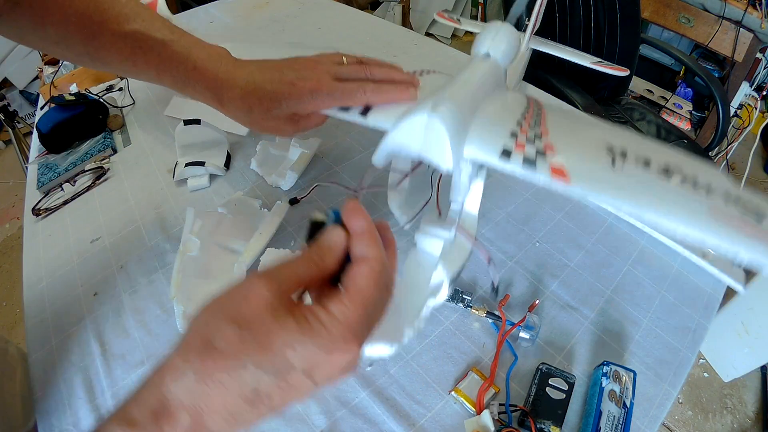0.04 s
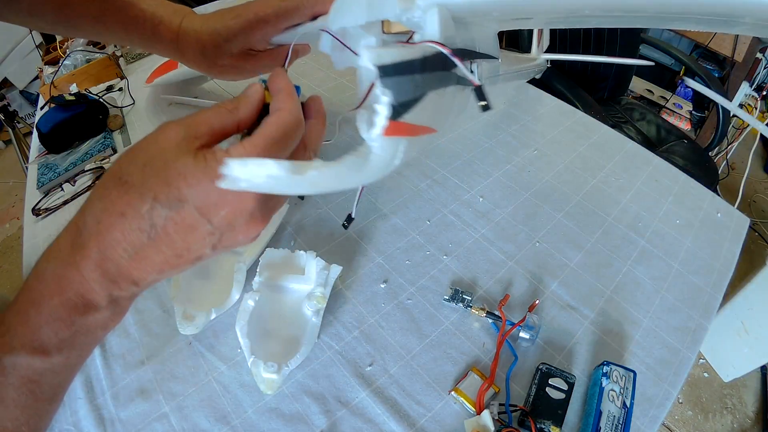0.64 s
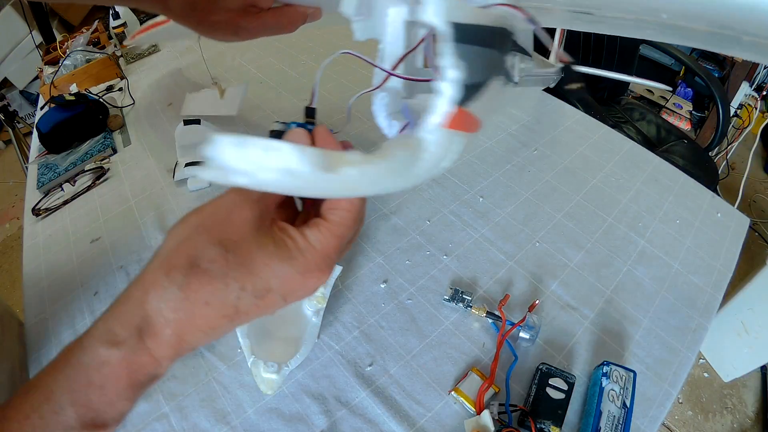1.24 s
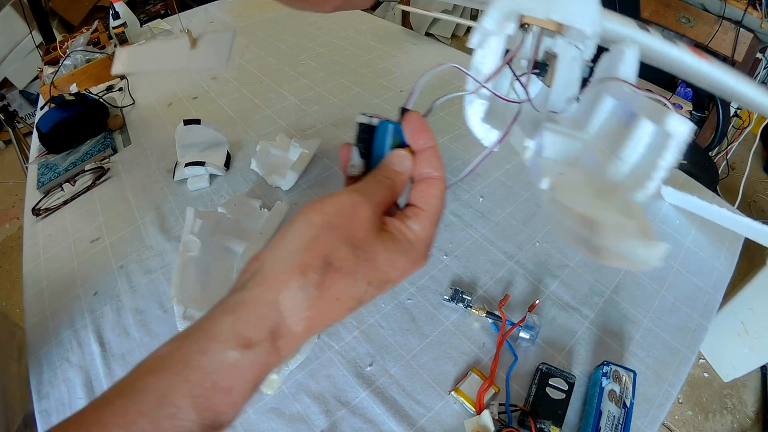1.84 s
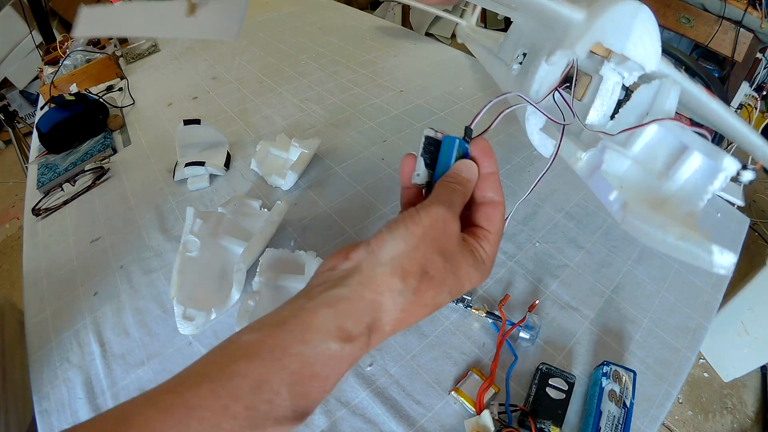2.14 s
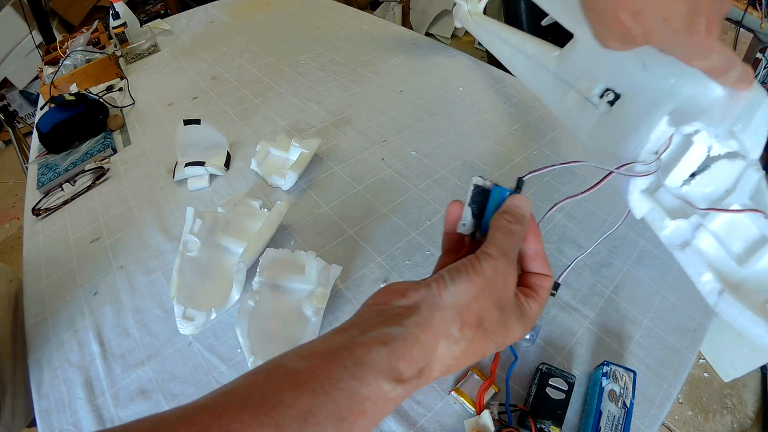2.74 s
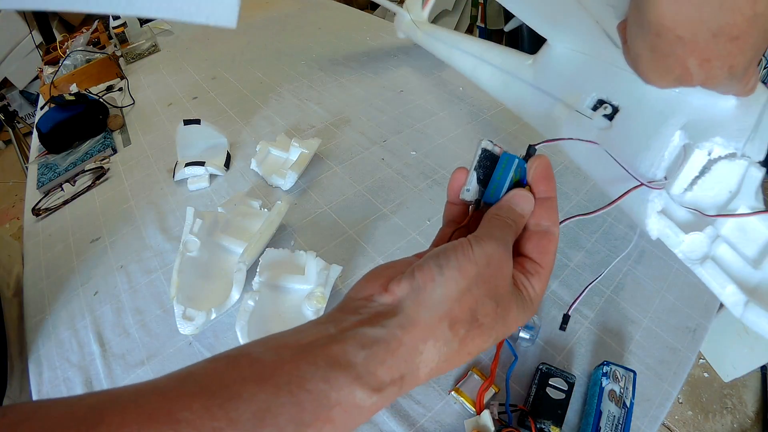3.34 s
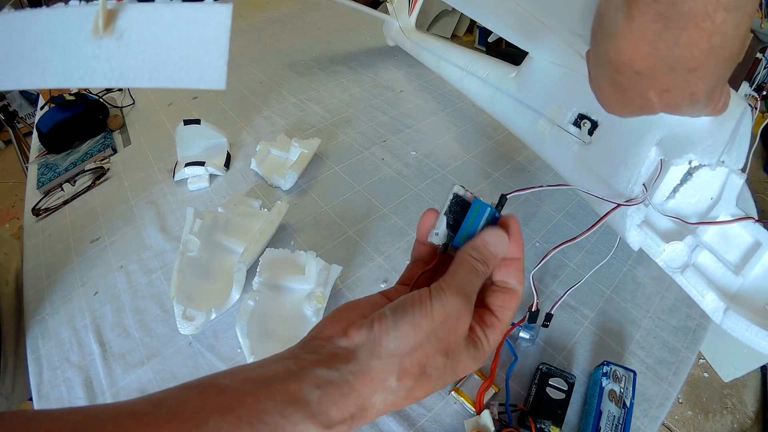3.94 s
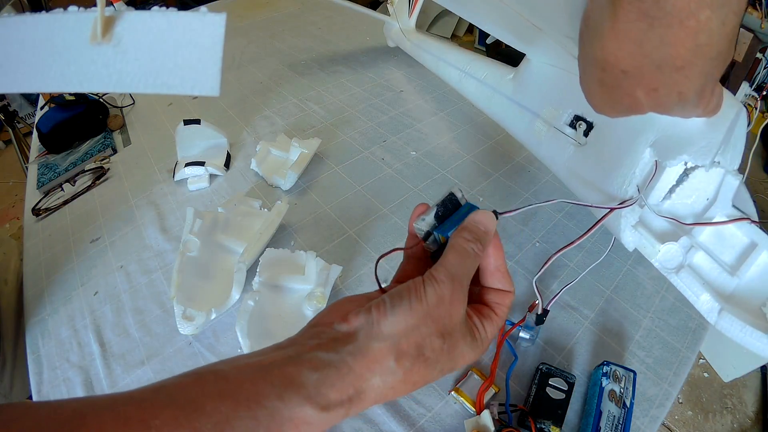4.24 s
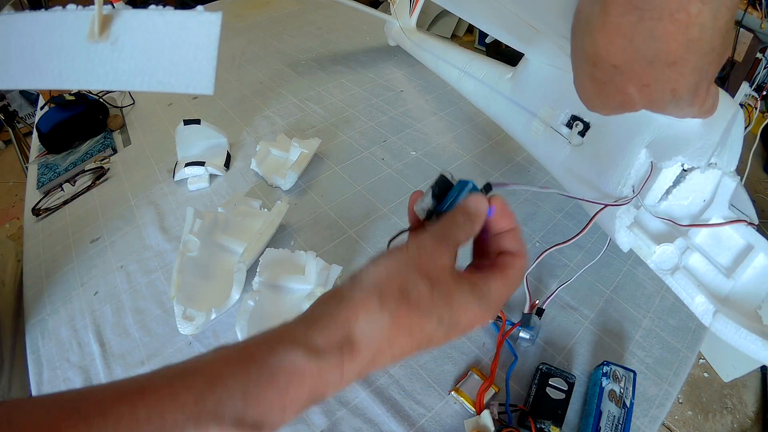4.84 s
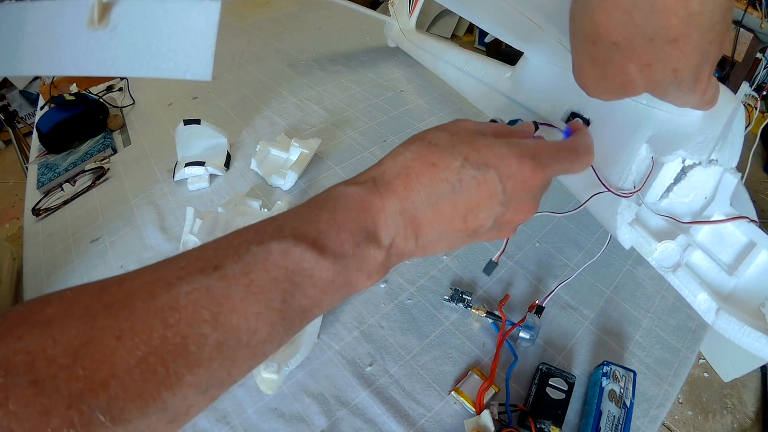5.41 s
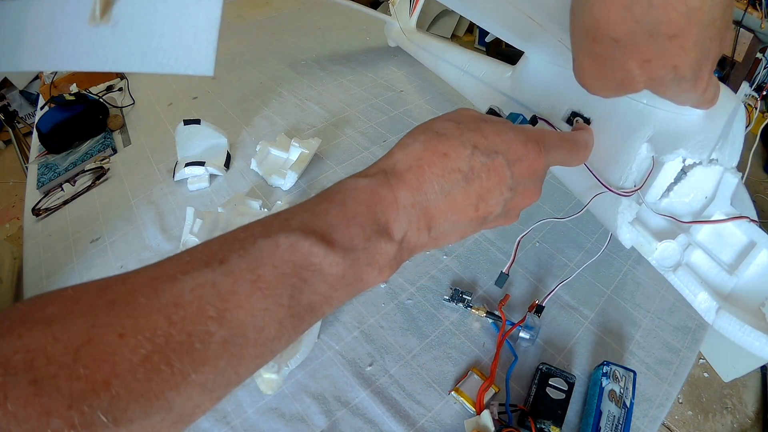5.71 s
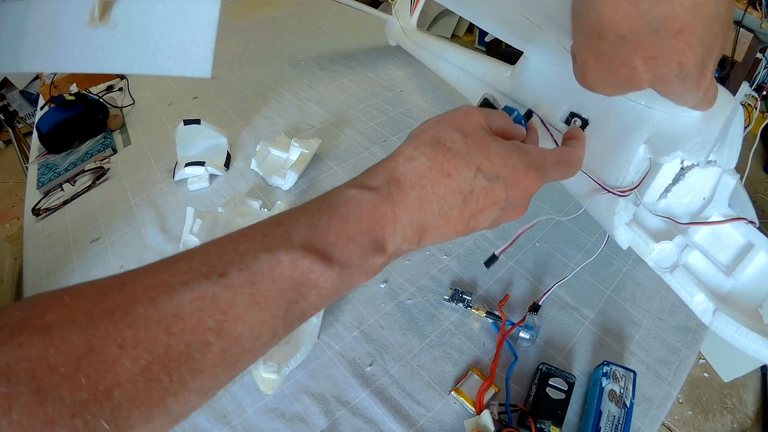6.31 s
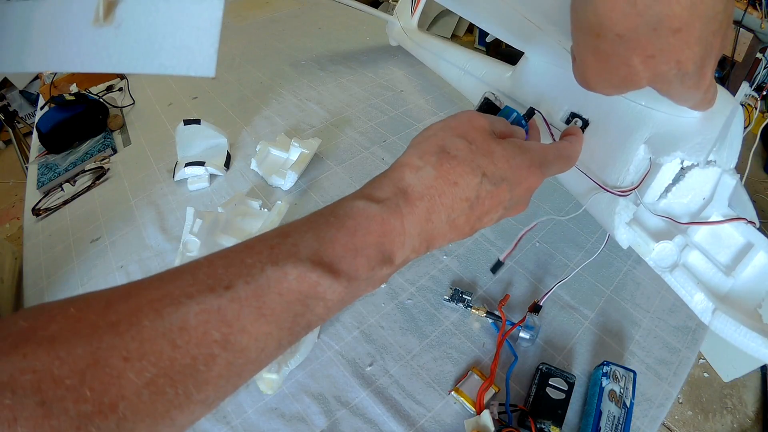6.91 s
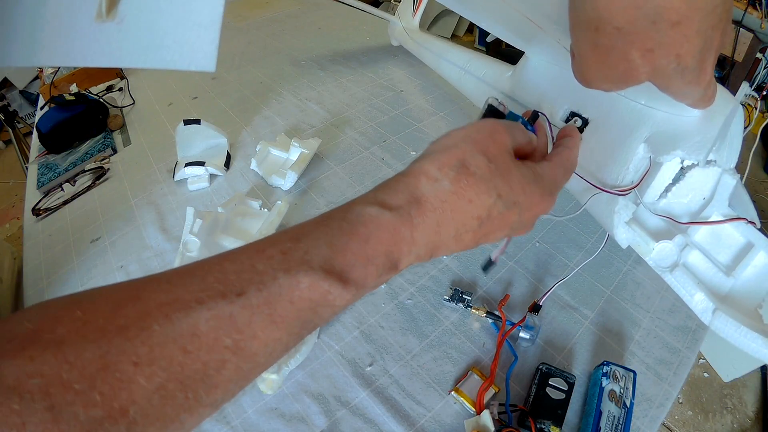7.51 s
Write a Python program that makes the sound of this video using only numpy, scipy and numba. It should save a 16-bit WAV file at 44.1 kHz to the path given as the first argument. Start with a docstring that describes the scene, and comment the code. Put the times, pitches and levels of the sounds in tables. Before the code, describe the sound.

A small servo's plastic gears buzz with a fine, fast rattle, swelling into short whirrs as it is nudged. Hands thud and rub on a foam model plane, and plastic parts click. Near the middle the servo makes two quick, loud, high whining sweeps, then goes back to buzzing on and off among light, dull finger taps. Everything is close to the microphone in a quiet workshop with a faint hum.

```python
"""First comes the buzz of a small servo's plastic gears, held over a bench beside a foam model plane.
A tester kicks its motor 61 times a second, which rattles the gears. When the knob turns they whirr,
and in two fast sweeps they whine. Hands bump, tap, rub and squeak on the foam, plastic parts click,
and the workshop hums faintly and adds a short echo."""
import sys
import numpy as np
from scipy import signal
from scipy.fft import rfft, irfft
from scipy.io import wavfile
from scipy.ndimage import uniform_filter1d, map_coordinates
from numba import njit

SR = 44100
rng = np.random.default_rng(int(sys.argv[2]) if len(sys.argv) > 2 else 0)


def output_pcm(signal):
    """Save a mono or channel-first signal as 16-bit PCM at the path in sys.argv[1].

    Samples are clipped to [-1, 1] before scaling.
    """
    pcm = np.clip(np.atleast_2d(signal).T, -1, 1) * 32767
    wavfile.write(sys.argv[1], SR, np.round(pcm).astype(np.int16))


N = 333396
TIME = np.arange(N) / SR
KICK_HZ = 60.9   # how often the tester kicks the motor

# the tone of the servo's case while the gears run: pitch_hz, gain_db
RUNNING_TONE = [(250, -20), (900, -4.5), (2300, -8.5), (2850, -12), (3300, -2), (6200, 3), (8800, -6),
                (10200, 1.5), (11400, -11.5), (15500, -20)]
# the pitches at which the case rings: pitch_hz, width_hz, boost_db
CASE_RINGS = [(3460, 1000, 5.5), (4530, 58, 9.5), (5020, 330, 5), (5786, 220, 6.5), (6670, 110, 6.5),
              (7740, 150, 4)]


def from_db(db):
    """Turn decibels into a gain to multiply by."""
    return 10 ** (np.asarray(db) / 20)


def unit_power(x):
    """Scale a sound to an average power of 1."""
    return x / np.sqrt(np.mean(x ** 2) + 1e-20)


def curves(rows):
    """Join timed rows with straight lines: one curve for each column after the time."""
    times, *columns = np.transpose(rows)
    return [np.interp(TIME, times, column) for column in columns]


def gain_at(tone, hz):
    """Look up the gain at a pitch in a table of pitch_hz, gain_db."""
    pitches, db = np.transpose(tone)
    return from_db(np.interp(np.log(hz + 1), np.log(pitches), db))


def band(x, low_hz, high_hz, order=2):
    """Keep the part of a sound between two pitches."""
    edges = [low_hz, min(high_hz, .48 * SR)]
    return signal.sosfilt(signal.butter(order, edges, "band", fs=SR, output="sos"), x)


def drift(rate_hz):
    """A smooth random wander, about 1 either way."""
    points = rng.standard_normal(N // 8)
    return map_coordinates(points, [TIME * rate_hz], order=2, mode="wrap")


def colour(x, tone, rings=()):
    """Filter a sound with a broad tone and ringing peaks on top."""
    size = 2048
    hz = np.arange(size // 2 + 1) * SR / size
    peaks_db = sum(db / (1 + (2 * (hz - pitch) / width) ** 2) for pitch, width, db in rings)
    cepstrum = irfft(np.log(gain_at(tone, hz) * from_db(peaks_db)))
    # this fold makes the filter ring after a hit, never before it
    cepstrum[1:size // 2] *= 2
    cepstrum[size // 2 + 1:] = 0
    return signal.oaconvolve(x, irfft(np.exp(rfft(cepstrum))))[:N]


def grains(spread_db):
    """Noise of many tiny contacts, some stronger than others."""
    return unit_power(rng.standard_normal(N) * from_db(spread_db * drift(3000)))


def fade(t60, size=8000):
    """A fade that drops 60 dB in t60 seconds."""
    return from_db(-60 * TIME[:size] / t60)


def hump(offset, width):
    """A smooth rise and fall, highest where offset is 0."""
    return np.exp(-(offset / width) ** 2)


def add(out, start_s, peak_db, sound):
    """Mix a sound in at a given time and peak level."""
    at = max(round(start_s * SR), 0)
    out[at:at + len(sound)] += (from_db(peak_db) * sound / np.abs(sound).max())[:N - at]


def even_out(x):
    """Keep the power of the gears' main band near 1, averaged over two kicks."""
    power = uniform_filter1d(band(x, 3000, 8000) ** 2, size=round(2 * SR / KICK_HZ))
    return x / np.sqrt(power + 1e-12)


@njit
def gliding_ring(x, hz, width_hz):
    """A filter that rings at a moving pitch, with a gain of 1 there."""
    out, r = np.zeros(len(x)), np.exp(-np.pi * width_hz / SR)
    for i in range(2, len(x)):
        push = (1 - r * r) / 2 * (x[i] - x[i - 2])
        out[i] = push + 2 * r * np.cos(2 * np.pi * hz[i] / SR) * out[i - 1] - r * r * out[i - 2]
    return out


def workshop_hum():
    """A faint, steady, low noise fills the room."""
    # the tone of the room's noise: pitch_hz, gain_db
    hum_tone = [(30, -69), (70, -28), (130, 1.5), (220, 6), (550, -0.5), (1200, -6.5), (2000, -9.5),
                (3500, -16.5), (15000, -25.5)]
    return from_db(-63) * unit_power(colour(rng.standard_normal(N), hum_tone))


def workshop_echo(x):
    """The cluttered room answers with a short, dull echo."""
    tail = fade(t60=0.3, size=20000) * (TIME[:20000] > .004)
    echo = band(tail * rng.standard_normal(len(tail)), low_hz=116, high_hz=6000, order=1)
    return signal.oaconvolve(x, echo / np.sqrt(np.sum(echo ** 2)))[:N]


def rubbing():
    """Skin catches and slips on the foam: softly at rest, louder in each stroke."""
    # slides of the hand: middle_s, half_length_s, level_db
    strokes = [(0.36, 0.22, -59), (0.96, 0.45, -64), (2.39, 0.18, -46.5), (2.76, 0.9, -52.5),
               (3.143, 0.053, -41.5), (3.51, 0.22, -48.5), (5.174, 0.84, -59), (7.146, 0.27, -62)]
    # the tone of rubbed foam: pitch_hz, gain_db
    rub_tone = [(50, -35.5), (120, -11.5), (300, -7), (550, 0.5), (1150, -3), (2200, -19.5), (4000, -26)]
    slips = grains(spread_db=3) * from_db(3.2 * drift(120))
    sliding = sum(from_db(db) * hump(TIME - middle_s, half_s) for middle_s, half_s, db in strokes)
    return (from_db(-60.5) + sliding) * unit_power(colour(slips, rub_tone))


def squeak():
    """Skin sticks and slips on the foam, faster as the finger speeds up."""
    # the course of the squeak: time_s, pitch_hz, level_db
    path = [(.345, 560, -66), (.355, 600, -39), (.372, 712, -42), (.385, 815, -49), (.41, 816, -59)]
    hz, db = curves(path)
    phase = 2 * np.pi * np.cumsum(hz * (1 + 0.042 * drift(208.3))) / SR
    touching = (TIME > path[0][0]) & (TIME < path[-1][0])
    return from_db(db) * touching * (np.sin(phase) + 0.19 * np.sin(2 * phase))


def taps():
    """A fingertip makes a dull pock and a faint shiver in the foam."""
    # light finger taps: start_s, level_db, pitch_hz
    touches = [(0.557, -30.5, 725), (3.499, -20.5, 1210), (3.85, -34.5, 1030), (4.059, -33, 1140),
               (4.262, -37, 560), (4.87, -34, 1150), (5.001, -27.5, 655), (5.284, -32, 530),
               (5.491, -25.5, 590), (5.625, -33, 605), (5.938, -36, 490), (5.985, -33.5, 620),
               (6.136, -32, 555), (6.304, -30.5, 670), (6.379, -36.5, 509), (6.693, -38, 473),
               (6.732, -28, 860), (6.898, -34.5, 770), (7.124, -31, 650), (7.153, -31.5, 1000),
               (7.269, -33, 514), (7.463, -33.5, 475)]
    out = np.zeros(N)
    for start_s, db, pitch_hz in touches:
        shiver = .13 * fade(t60=.05) * rng.standard_normal(8000)
        add(out, start_s, db + .5, band(fade(t60=0.00062) + shiver, .65 * pitch_hz, 1.8 * pitch_hz))
    return out


def bumps():
    """The foam body thuds and its skin crunches; each spot brings out different notes."""
    # knocks on the foam: start_s, level_db, pitch_hz, bass_db (compared with the whole knock)
    knocks = [(0.295, -41, 223, -14), (0.328, -28.5, 556, -18.5), (0.349, -42, 660, -18),
              (1.144, -42.5, 252, -19.5), (1.18, -37, 1010, -17), (2.003, -26, 700, -20.5),
              (2.064, -32.5, 544, -21.5), (2.318, -28.5, 651, -16), (2.38, -19.5, 760, -17),
              (2.414, -26, 640, -16.5), (3.082, -29.5, 815, -40.5), (3.134, -33.5, 600, -46),
              (3.261, -15.5, 724, -56.5), (3.285, -18, 646, -46.5), (3.373, -34, 538, -36)]
    # the notes of the foam body: pitch_hz, level_db, fade_s (to drop 60 dB)
    foam_notes = [(129, -7.5, 0.25), (189, -5, 0.32), (288.8, -1.5, 0.12), (380, -2, 0.11),
                  (409, 0.5, 0.082), (528, -0.5, 0.16), (596, -3, 0.1), (731, 2.5, 0.07), (985, -16, 0.024),
                  (1164, -7, 0.016)]
    out = np.zeros(N)
    for start_s, db, pitch_hz, bass_db in knocks:
        thud = 0
        for hz, note_db, fade_s in foam_notes:
            bass_lift_db = (hz < 260) * 0.95 * (bass_db + 19)
            spot_db = -2 * abs(np.log2(hz / pitch_hz)) + bass_lift_db + rng.normal(0, 0.88)
            # the hand stays on the foam and quickly soaks up the first swing
            decay = fade(fade_s) + 0.59 * fade(t60=0.025)
            swing = rng.choice([-1, 1]) * from_db(note_db + spot_db) * decay
            thud = thud + swing * np.sin(2 * np.pi * hz * rng.normal(1, 0.013) * TIME[:len(decay)])
        crunch = band(rng.standard_normal(len(thud)) * fade(t60=0.18), low_hz=448, high_hz=1260)
        # a glancing touch cannot move the whole body, so it lacks the lowest notes
        low_hz = np.interp(bass_db, [-35, -12], [270, 110])
        add(out, start_s, db + 2, band(thud + 3.6 * crunch, low_hz, high_hz=1990, order=3))
    return out


def clicks():
    """Hard plastic parts snap against each other."""
    # sharp clicks: start_s, peak_db, pitch_hz
    snaps = [(1.116, -44, 4440), (2.1826, -28, 4200), (2.3233, -19.5, 4940), (2.4602, -17, 4600),
             (3.055, -31, 4660), (3.085, -29.5, 5140), (4.32, -33.5, 5890), (5.4936, -40.5, 8050),
             (6.1395, -38.5, 3530), (6.319, -51, 7240), (6.334, -45.5, 3180), (6.6357, -42.5, 6250),
             (6.7267, -22.5, 4800), (7.239, -36.5, 3250), (7.438, -31, 6400)]
    out = np.zeros(N)
    for start_s, db, pitch_hz in snaps:
        decay = fade(t60=0.039) + 0.18 * fade(t60=0.073)
        snap = band(decay * rng.standard_normal(len(decay)), .6 * pitch_hz, 1.6 * pitch_hz, order=1)
        add(out, start_s, db, band(snap, low_hz=1800, high_hz=13500))
    return out


def palm_echo(x):
    """The palm sends back an echo from a slowly changing distance."""
    delay_s = 0.001157 + .0001 * drift(1.281)
    return x + .45 * np.interp(TIME - delay_s, TIME, x)


def shifting_ring(x):
    """A ring in the gears' buzz shifts between a lower pitch and higher ones."""
    # spans of higher ring: start_s, length_s, pitch_hz
    high_spans = [(2.46, 0.69, 5300), (3.703, 1.4, 6000), (5.122, 0.34, 6000), (6.647, 1.13, 6400)]
    low_ring_hz, shift_s = 3850.0, 0.072
    rise_hz = sum((hz - low_ring_hz) * ((TIME > start_s) & (TIME < start_s + length_s))
                  for start_s, length_s, hz in high_spans)
    ring_hz = low_ring_hz + uniform_filter1d(rise_hz, size=round(shift_s * SR))
    return x + gliding_ring(x, ring_hz, 480.0)


def swell(start_s, length_s, ramp_s):
    """A movement rises 27.5 dB per ramp_s, holds, then coasts down more slowly."""
    early_s = np.maximum(start_s - TIME, 0)
    late_s = np.maximum(TIME - start_s - length_s, 0)
    return from_db(-np.minimum(27.5 * (early_s + late_s / 1.63) / ramp_s, 200))


def motor_motion():
    """The motor holds, nudges and sweeps: gives level, share of turning, tooth pitch and whine gain."""
    # the servo holds its place and buzzes: start_s, length_s, level_db
    holds = [(0, 1.084, -49), (1.165, 1.85, -47.5), (3.79, 1.183, -49), (5.242, 0.21, -50.5),
             (5.649, 0.419, -51), (6.69, 0.79, -51.5)]
    # nudges of the knob: start_s, length_s, level_db, ramp_s, share (0-1) of turning between kicks
    nudges = [(0.649, 0.0077, -44, .03, 0.6), (.735, 0.009, -42.5, 0.044, 0.5),
              (0.795, 0.026, -37.5, 0.04, 0.4), (0.906, .062, -34, 0.042, .4),
              (1.246, .008, -38, 0.031, 0.1), (1.3, 0.016, -36, .04, 0.5), (1.358, .11, -43, .04, 0),
              (1.799, 0.096, -45, 0.097, 1), (2.318, 0.043, -35, 0.021, 1),
              (2.485, 0.039, -31, 0.079, 0.13), (2.579, 0.041, -27, 0.068, 0.4),
              (2.69, 0.084, -36.5, .04, 0), (2.814, 0.08, -34.5, 0.044, 0),
              (2.908, 0.046, -30.5, 0.06, 0.2), (3.155, 0.01, -28.5, 0.076, 1), (3.489, 0.011, -26, .03, 1),
              (3.703, 0.013, -23.5, 0.03, 0.9), (4.558, 0.02, -34, 0.014, 1),
              (4.598, 0.029, -29, .045, 0.7), (4.711, 0.014, -32.5, 0.043, 0.35),
              (5.137, 0.015, -41.5, 0.018, 0.25), (5.176, .043, -28, 0.047, 0.25),
              (5.59, 0.015, -42.5, 0.073, .1), (6.499, 0.008, -48, 0.022, 1),
              (6.774, 0.083, -35, 0.093, .2), (7.537, 0.013, -34.5, 0.033, 0.7)]
    # how fast the teeth meet in the sweep out and the sweep back: time_s, pitch_hz
    sweep_out = [(3.195, 1800), (3.21, 1950), (3.24, 2290), (3.26, 2385), (3.302, 2475), (3.332, 2385),
                 (3.36, 2205), (3.40, 1830), (3.425, 1700)]
    sweep_back = [(3.526, 3200), (3.536, 2650), (3.56, 2310), (3.58, 2470), (3.62, 2545), (3.66, 2545),
                  (3.684, 2420), (3.702, 2290), (3.714, 1950)]
    power = sum((from_db(db) * swell(start_s, length_s, ramp_s=0.13)) ** 2
                for start_s, length_s, db in holds)
    turning = whining = 0
    for start_s, length_s, db, ramp_s, share in nudges:
        nudge = (from_db(db) * swell(start_s, length_s, ramp_s)) ** 2
        power, turning = power + nudge, turning + share * nudge
    # in a sweep, level and whine both grow with speed
    tooth_hz, = curves(sweep_out + sweep_back)
    full_speed_hz = 2503
    octaves = np.minimum(np.log2(tooth_hz / full_speed_hz), 0)
    for path, db in ((sweep_out, -18.5), (sweep_back, -21.5)):
        sweeping = swell(path[0][0], path[-1][0] - path[0][0], ramp_s=0.017)
        sweep = (sweeping * from_db(db + 25.5 * octaves)) ** 2
        power, turning = power + sweep, turning + sweep
        whining = whining + sweeping ** 2
    whine_gain = whining * from_db(14 + 19.5 * octaves)
    return 10 * np.log10(power), np.clip(turning / power, 0, 1), tooth_hz, whine_gain


def gear_whine(tooth_hz):
    """Teeth meet fast enough to sing, and worn ones scuff again on every turn."""
    # the tones of the meeting teeth: multiple of the tooth pitch, level_db
    harmonics = [(1, -4.5), (2, 0.5), (3, 3), (4, -2.5), (5, -11.5), (6, -7.5)]
    # how the case shapes the whine: pitch_hz, gain_db
    whine_tone = [(2500, -15.5), (4000, -2.5), (4900, 2.5), (6400, 2), (7400, -12.5), (8500, -7.5),
                  (10000, 3.5), (11500, -2.5), (15000, -10)]
    teeth = 9   # on the motor's small gear
    phase = 2 * np.pi * np.cumsum(tooth_hz * (1 + 0.00476 * drift(200))) / SR
    shaft = phase / teeth
    # an off-centre gear and slack between teeth shift each contact, blurring high tones most
    wobble = 0.117 * np.sin(shaft) + 0.12 * np.sin(2 * shaft + 1)
    slack = .16 * drift(900)
    tones = 0
    for multiple, db in harmonics:
        gain = from_db(db + 3.1 * drift(300)) * gain_at(whine_tone, multiple * tooth_hz)
        tones = tones + gain * np.sin(multiple * (phase + wobble + slack))
    tones = even_out(tones * (1 + .25 * np.sin(shaft)))
    wear = rng.standard_normal(size=120)
    scuffs = map_coordinates(wear, [shaft / (2 * np.pi) * len(wear)], order=2, mode="grid-wrap")
    scuffs = even_out(band(colour(scuffs, RUNNING_TONE, CASE_RINGS), 3000, 12000))
    return even_out(tones + .25 * scuffs)


def gear_rattle(effort):
    """Each kick throws the gears across their slack; harder pushes last longer and are more even."""
    cycles = TIME * KICK_HZ + .32 + .04 * drift(30)   # the timing wanders a little
    kick_number, offset = np.floor(cycles).astype(int), cycles % 1 - .5
    unevenness = rng.standard_normal(kick_number.max() + 2)[kick_number]
    strength = from_db((-0.6 + 0.64 * effort) * unevenness)
    between_kicks = 0.35
    bursts = strength * hump(offset, width=0.14 + 0.13 * effort) + between_kicks
    # for a moment the motor hunts for its place: the gears also fall back on every second kick
    hunting = (TIME > 4.06) & (TIME < 4.55)
    bursts = bursts + 1.7 * hunting * (kick_number % 2 == 1) * hump(offset + .37, width=.08)
    # the same teeth meet on each kick, so part of the rattle repeats, most while it hunts
    same_teeth = grains(spread_db=2)[((offset + .5) * SR / KICK_HZ).astype(int)]
    fresh = grains(spread_db=3) * from_db(1.5 * drift(600))
    return unit_power(bursts * ((.4 + .9 * hunting) * same_teeth + fresh))


def servo():
    """The gears rattle in their case, blur into a whirr as they turn, and whine at speed."""
    # the tone of the case while the gears buzz: pitch_hz, gain_db
    buzz_tone = [(200, -35), (600, -22), (2250, 3.5), (2850, -9.5), (3200, 1), (5000, -2), (7200, -2),
                 (8600, -10.5), (9900, -8.5), (11300, -11.5), (15500, -21)]
    level_db, turning, tooth_hz, whine_gain = motor_motion()
    effort = np.clip((level_db + 49) / 16, 0, 1)
    rattle = gear_rattle(effort)
    whirr = unit_power(grains(spread_db=-3.5) * from_db(3.5 * drift(400)))
    contacts = np.sqrt(1 - turning) * rattle + np.sqrt(turning) * whirr
    # harder contacts are brighter
    soft = even_out(colour(contacts, buzz_tone, CASE_RINGS))
    hard = even_out(colour(contacts, RUNNING_TONE, CASE_RINGS))
    gears = even_out(palm_echo(shifting_ring((1 - effort) * soft + effort * hard)))
    blend = (gears + whine_gain * gear_whine(tooth_hz)) / np.sqrt(1 + whine_gain ** 2)
    return from_db(level_db - 3.5) * blend


def scene():
    """The servo and the hands are close by, in a quiet workshop."""
    plastic = servo() + clicks()
    hands = bumps() + taps() + rubbing() + squeak()
    hum = workshop_hum()
    echo = workshop_echo(from_db(-17) * plastic + from_db(-14.5) * hands)
    return (plastic + hands + echo + hum)[None]


def record(dry):
    """A small microphone loses the deep bass, and the highest treble is cut steeply."""
    thin = signal.sosfilt(signal.butter(2, 70, "high", fs=SR, output="sos"), dry)
    treble_cut = signal.firwin(301, 15900, fs=SR, window="blackman")
    return signal.oaconvolve(thin, treble_cut[None], mode="same")


dry = scene()
out = record(dry)
output_pcm(out)
```